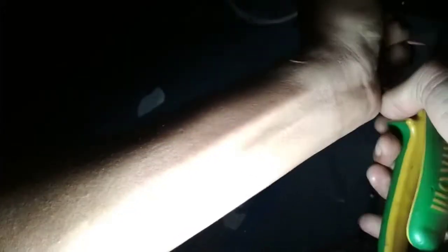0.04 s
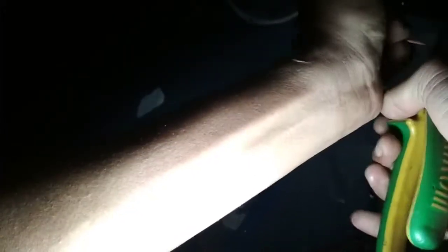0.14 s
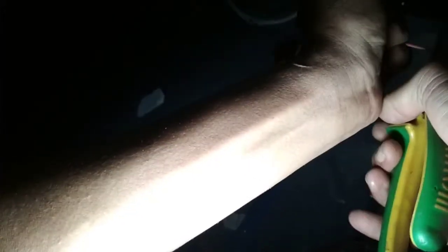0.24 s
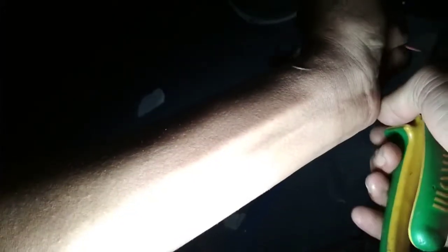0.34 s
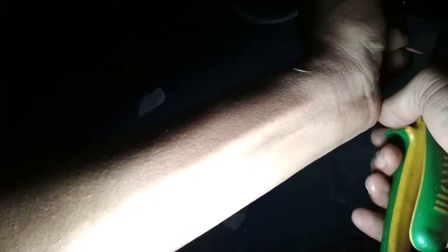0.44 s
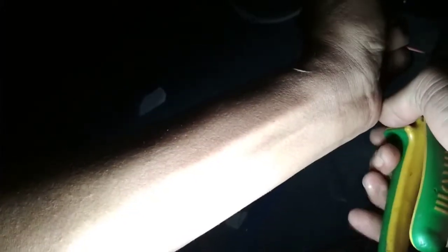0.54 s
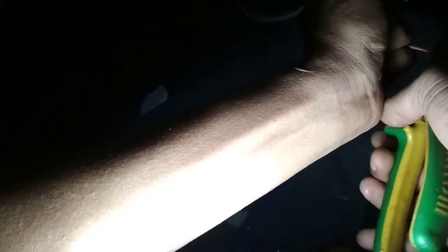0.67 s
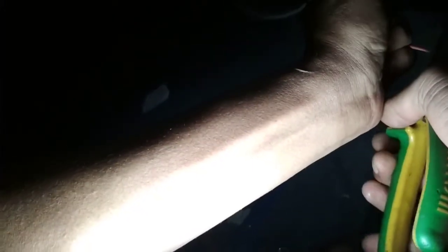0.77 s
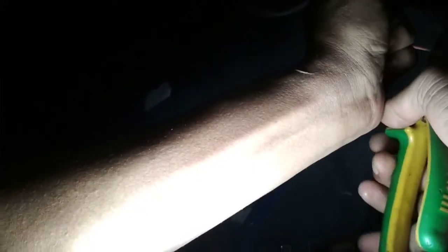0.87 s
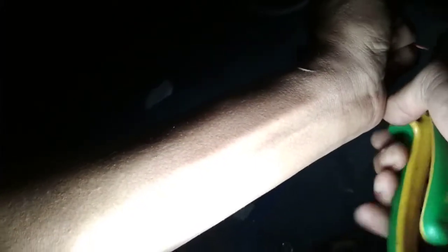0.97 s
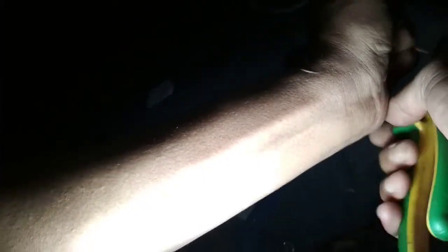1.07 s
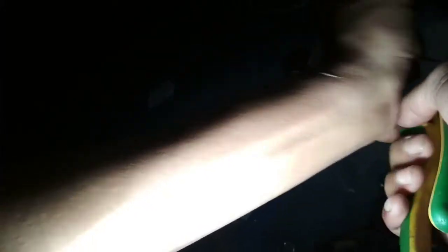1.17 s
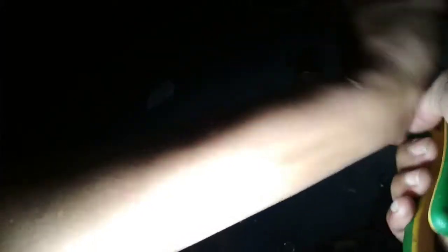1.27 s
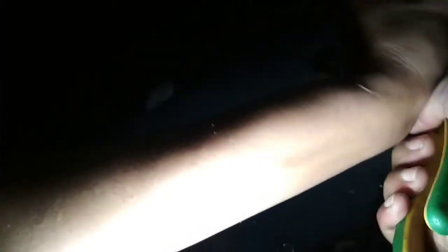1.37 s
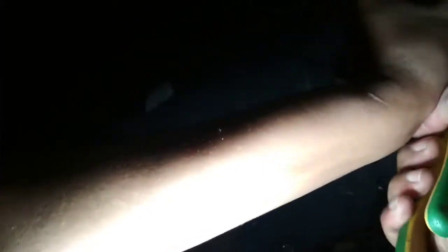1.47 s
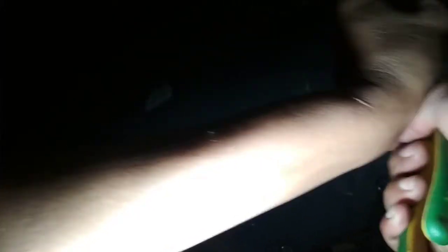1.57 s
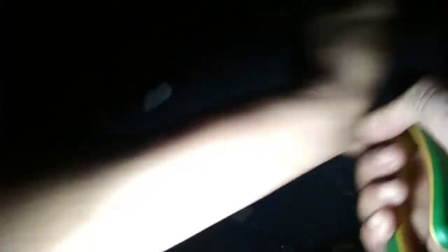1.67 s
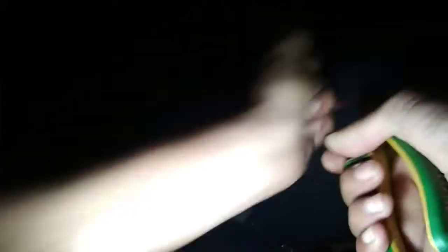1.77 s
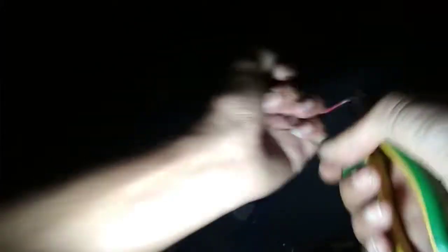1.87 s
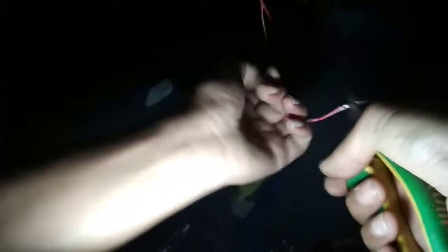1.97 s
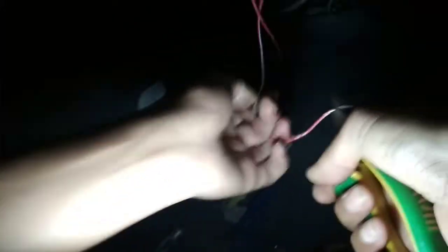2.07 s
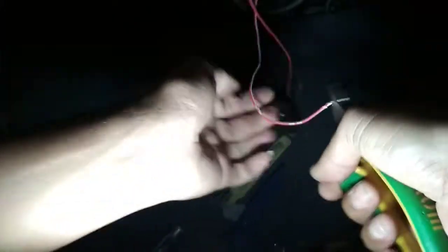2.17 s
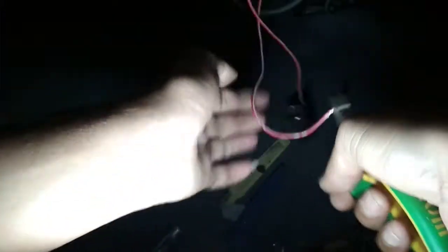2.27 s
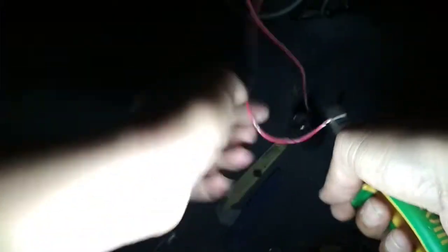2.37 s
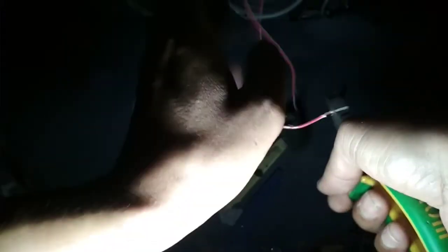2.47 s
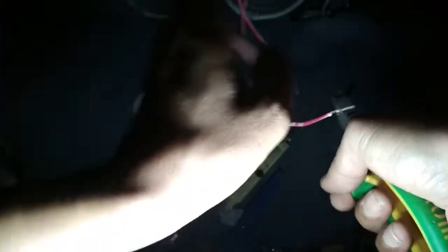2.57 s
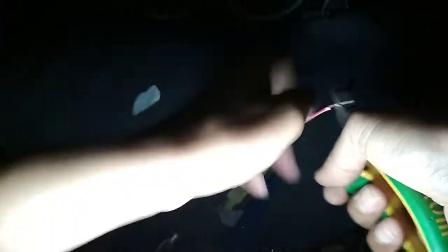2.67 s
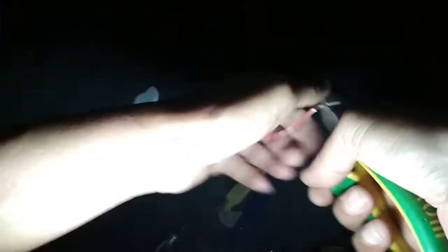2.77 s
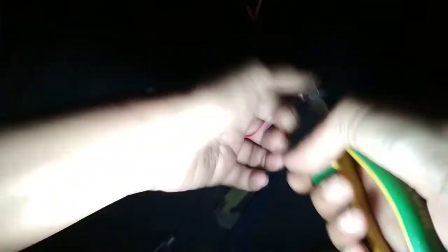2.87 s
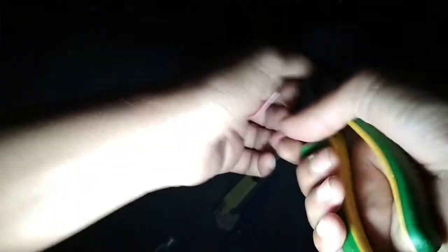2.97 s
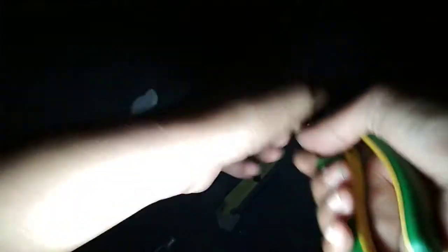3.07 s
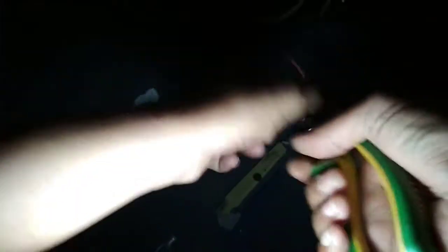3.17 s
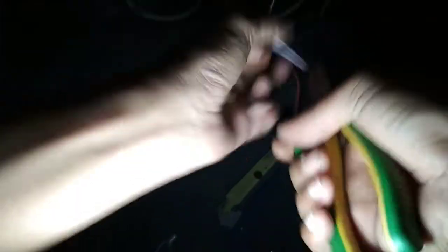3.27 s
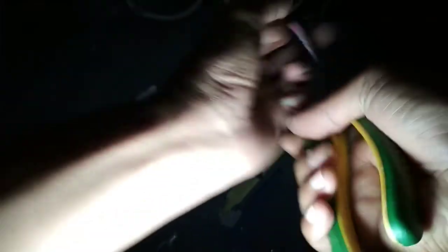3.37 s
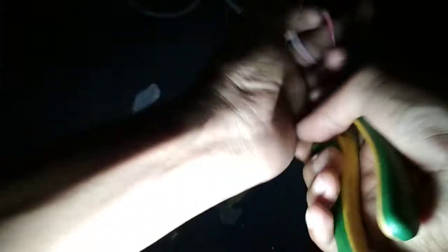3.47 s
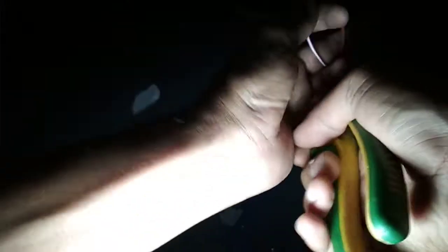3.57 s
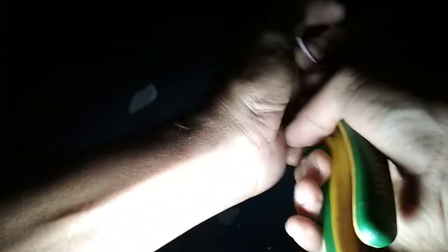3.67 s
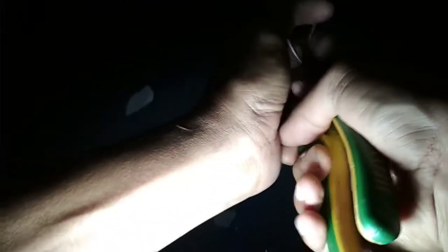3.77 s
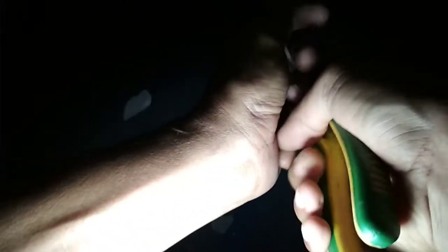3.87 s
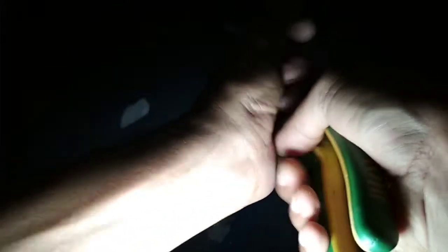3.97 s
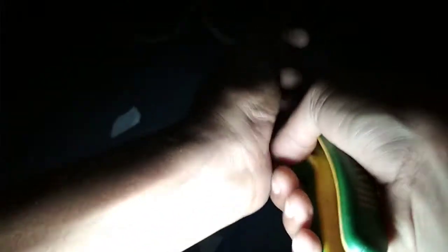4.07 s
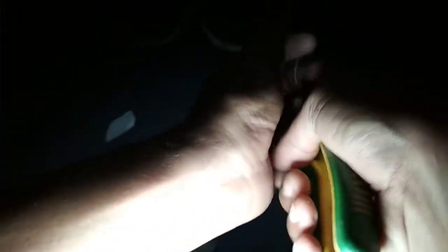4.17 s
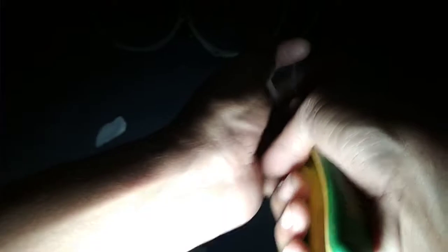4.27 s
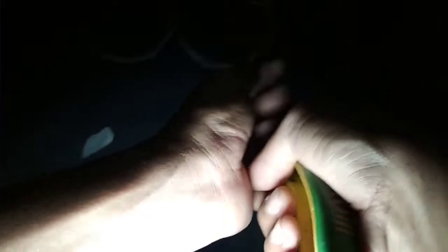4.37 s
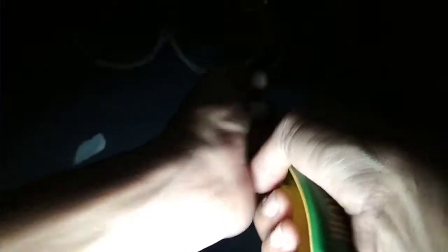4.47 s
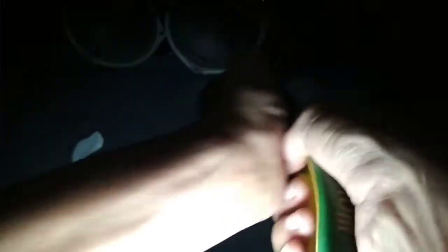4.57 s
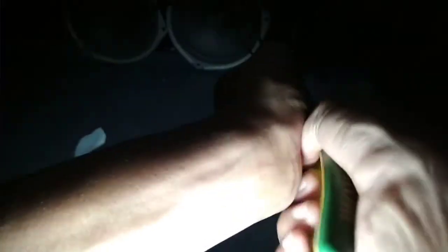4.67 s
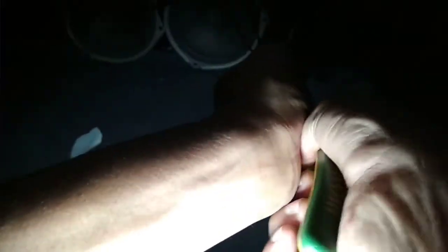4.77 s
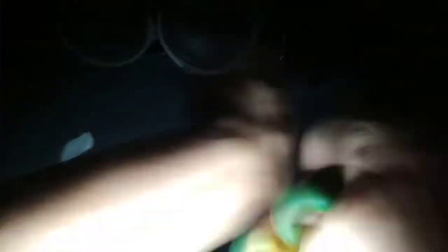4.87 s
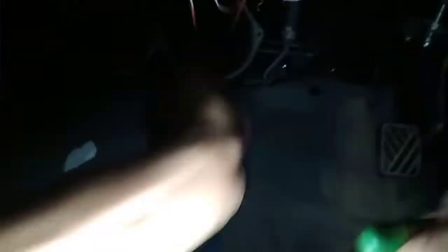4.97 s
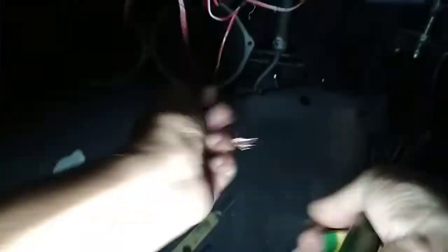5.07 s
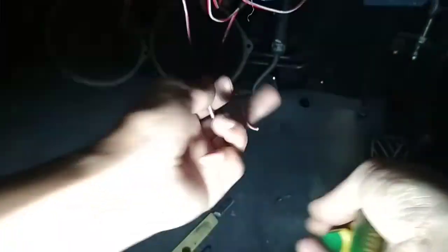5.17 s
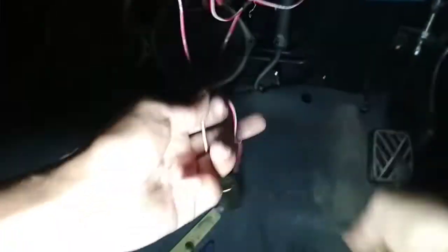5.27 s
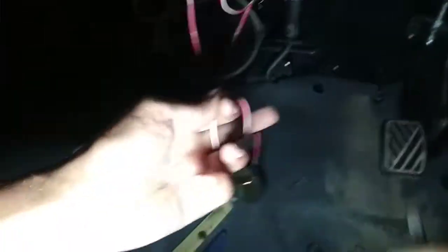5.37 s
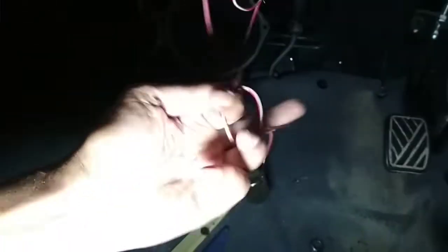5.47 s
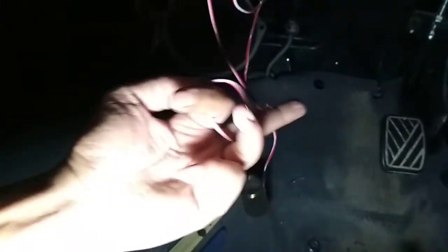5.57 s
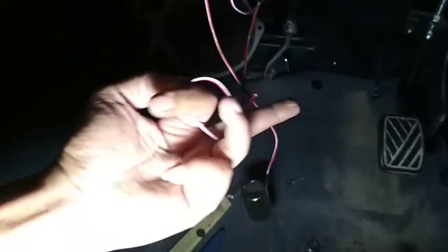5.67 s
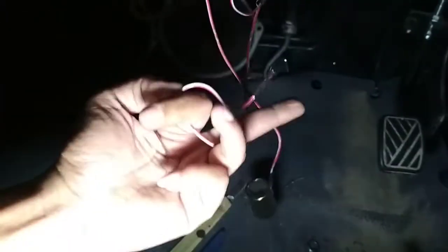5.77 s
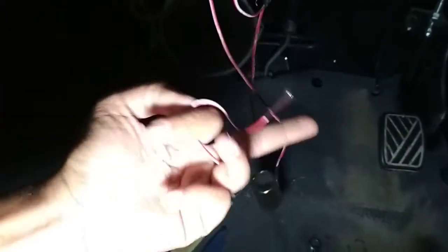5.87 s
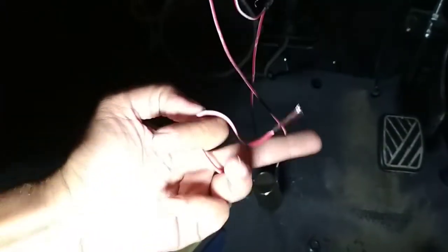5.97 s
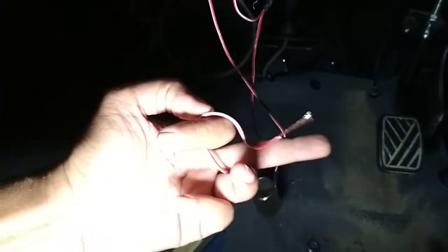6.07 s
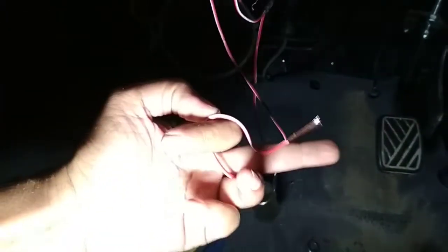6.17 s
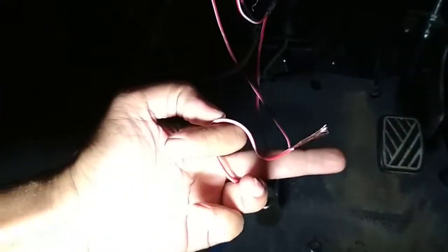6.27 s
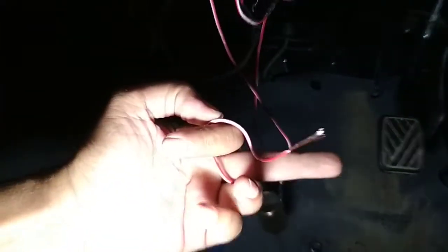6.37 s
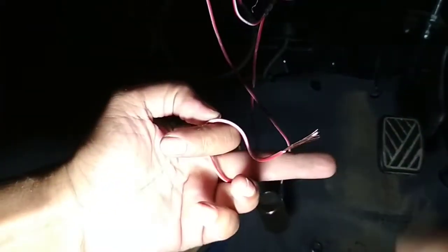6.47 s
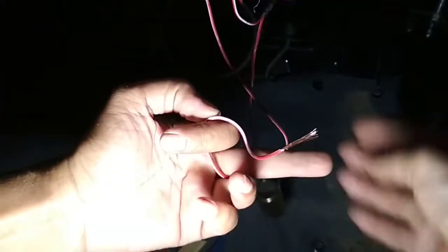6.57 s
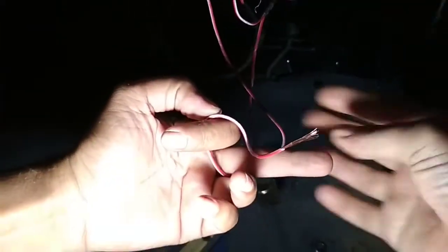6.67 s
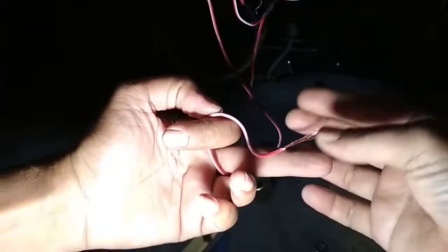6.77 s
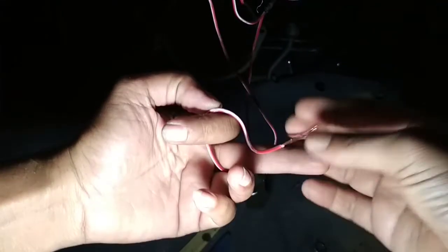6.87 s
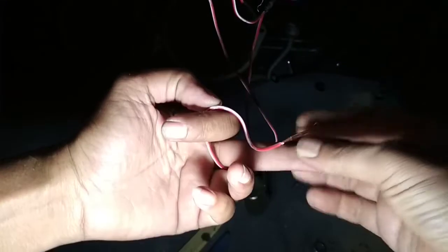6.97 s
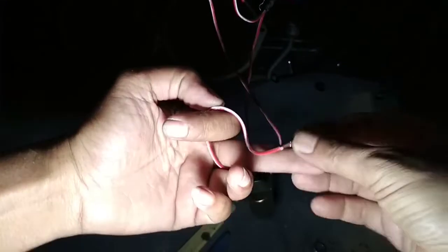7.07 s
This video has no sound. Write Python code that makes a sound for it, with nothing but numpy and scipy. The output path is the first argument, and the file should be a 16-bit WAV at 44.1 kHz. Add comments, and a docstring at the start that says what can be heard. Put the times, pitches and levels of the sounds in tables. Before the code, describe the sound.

Two hard knocks open close handling of a wire stripper in a vehicle footwell, with rubbing, clicks, then the tool clattering down on the floor.

```python
"""Two quick knocks of a tool on trim come first, then busy hands at a wire stripper, close to a phone.
The place is the footwell of a parked vehicle at night. Bumps are rung resonances, ticks filtered snaps.
Sleeves and fingers are shaped noise; each shift of weight booms in two low cabin modes.
The tool drops on the floor panel, ringing its modes; a faint hum follows.
Outside, an insect's wing tones throb at a trill rate over still air and a far chorus, both noise."""
import sys
import numpy as np
from scipy import signal
from scipy.io import wavfile
from scipy.ndimage import uniform_filter1d

SR = 44100
rng = np.random.default_rng(int(sys.argv[2]) if len(sys.argv) > 2 else 0)


def pcm_store(signal):
    """Save signal as 16-bit PCM."""
    levels = np.round(np.clip(np.atleast_2d(signal), -1, 1) * 32767)
    wavfile.write(sys.argv[1], SR, levels.astype(np.int16).T)


N = 314300

# trim panels around the footwell: (f/Hz, width/Hz, level/dB); slips of the grip use f alone
TRIM = [(200, 43, -23), (294.5, 69, -13.5), (405.7, 114, -1), (596, 70, -6), (775, 217, -3.5),
        (966, 18, -17.5)]
# left-right balance of the distant background: (f/Hz, level/dB)
AIR_PAN = [(60, 3.5), (180, 11.5), (550, -5), (1650, -0.5), (4970, 17), (15000, 22.5)]


def hand_strokes():
    """Palms and cloth rub dully and fingertips scrape, both with small slips on top."""
    # hands on wire, grip and cloth: (t/s at full level, hold/s, rubbing level/dB, scraping level/dB)
    stroke_rows = [(0.045, 0.29, -71, -66), (0.465, 0.097, -64.5, -66), (0.826, 0.24, -56.5, -60.5),
                   (1.322, 0.27, -64, -63.5), (1.639, 0.29, -46, -58), (1.98, 0.29, -52.5, -69),
                   (2.631, 0.27, -53, -61), (3.048, 0.097, -49.5, -65), (3.293, 0.26, -55.5, -69),
                   (3.626, 0.19, -60, -75), (3.846, 0.31, -56.5, -70.5), (4.337, .45, -56.5, -62),
                   (4.831, 0.04, -40, -38.5), (4.945, 0.46, -53.5, -56), (5.412, 0.43, -67, -61.5),
                   (5.872, 0.79, -70, -105.5), (6.408, 0.077, -40, -53), (6.575, 0.15, -58.5, -92)]
    # palms and cloth, relative density: (f/Hz, level/dB per Hz)
    rub_shape = [(71, -32.5), (120, 13), (183, -15), (294, 8.5), (800, -13), (1040, -43), (1760, -120)]
    # fingertips on wire and grip, relative density: (f/Hz, level/dB per Hz)
    scrape_shape = [(290, -45), (500, -11.5), (701, 0), (1330, -3.5), (2580, -12), (2900, -11.5),
                    (3770, -35.5), (6380, -120)]
    # fingers close on the bare strands: (t/s, level/dB)
    pinch = [(7.02, -81.5), (7.045, -55), (7.13, -58)]
    start, hold, rub_db, scrape_db = np.transpose(stroke_rows)
    rise_s, fall_db_per_s = 0.059, 231
    palms = gestures(start, hold, rub_db, rise_s, fall_db_per_s)
    tips = gestures(start, hold, scrape_db, rise_s, fall_db_per_s)
    rub = noise(rub_shape, patchy_db=5.5, grain_db=1.5)
    scrape = noise(scrape_shape, patchy_db=3.0, grain_db=4.5)
    rubbing = palms * (rub + amp(-20) * crackle())
    scraping = tips * (scrape + amp(-14) * crackle())
    return rubbing + scraping + stroke(pinch) * scrape


def crackle():
    """Sparse small slips of grip and wire, each landing on one mode of the trim."""
    slips_per_s = 90
    size = amp(3.6 * np.minimum(rng.exponential(1, N), 3))
    slips = size * (rng.random(N) < slips_per_s / SR)
    spot = rng.integers(0, len(TRIM), N)
    rung = 0
    for k, (hz, _, _) in enumerate(TRIM):
        rung = rung + resonate(resonate(slips * (spot == k), hz, 690), hz, 236)
    return evened(rung)


def sleeve_brushes():
    """Brushing cloth is bright noise; one swish is the same noise through a narrow bright band."""
    # brushes of the sleeve: (t/s at full level, hold/s, level/dB)
    brush_rows = [(0.028, 0.49, -65), (0.834, 0.19, -58), (1.404, 0.16, -57.5), (1.66, 0.59, -56),
                  (2.428, 0.12, -66.5), (2.604, 0.24, -59.5), (2.986, 0.17, -61), (3.387, .1, -60.5),
                  (3.61, 0.22, -70.5), (3.94, 0.048, -55.5), (4.043, 0.26, -73), (4.396, 0.18, -56),
                  (4.636, .12, -66), (4.833, 0.033, -44.5), (5, 0.41, -56.5), (5.44, 0.049, -66),
                  (5.705, 0.096, -67), (6.42, 0.17, -62.5), (6.877, 0.23, -76)]
    # cloth hiss, relative density: (f/Hz, level/dB per Hz)
    hiss_shape = [(1650, -52), (2800, -20), (4120, -18), (4500, -20), (5280, -16.5), (6920, -27),
                  (8420, -11.5), (9130, -54), (9740, -18.5), (12400, -6.5), (16000, -19)]
    # the narrow bright swish: (t/s, level/dB)
    swish_gain = [(1.75, -69), (1.9, -54.5), (2.15, -49.5), (2.3, -56), (2.4, -71)]
    hiss = noise(hiss_shape, patchy_db=3.5, grain_db=1.5)
    swish = evened(resonate(resonate(hiss, 12800, 1900), 10300, 2800))
    brushing = gestures(*np.transpose(brush_rows), rise=0.077, fall_db_per_s=102)
    return brushing * sides(4.4)[:, None] * hiss + stroke(swish_gain) * swish


def bumps():
    """A scuffing contact of some milliseconds rings the struck part, the trim behind it, a thump and an edge."""
    # bumps on trim and tool: (t/s, level/dB, ring f/Hz, upper ring f/Hz, upper ring level/dB re bump,
    # edge level/dB re bump, left-right level/dB, contact/s)
    bump_rows = [(0.077, -13, 883, 1410, -13, -26, 5, 0.0077),
                 (0.086, -20, 861, 1170, -16, -22, 2.5, 0.0071),
                 (0.21, -45, 1020, 2000, 2.5, 6.5, 9, 0.011),
                 (0.278, -40.5, 301, 1200, -12, -24, 4, 0.0088),
                 (0.421, -65, 385, 1540, 5, 15, -2.5, 0.012),
                 (0.493, -33, 325, 1170, -9.5, -16.5, 5.5, 0.012),
                 (0.838, -47, 293, 1320, -20, -16, -3, 0.0082),
                 (1.003, -38.5, 416, 1630, -6, -5, 5, 0.0052), (1.027, -21, 292, 1100, -33, -43, 1, 0.01),
                 (1.041, -27, 382, 1610, -14, -15, 7, 0.0081), (1.259, -39, 960, 1230, -18, -14, 4, 0.011),
                 (1.399, -41.5, 480, 1250, -31, -3, -7, 0.011),
                 (1.466, -41, 317, 1160, -19, -17, -3, 0.0086),
                 (1.497, -34, 925, 1090, -34, -14, 7, 0.0058),
                 (1.647, -41, 240, 1070, 0.5, -30, -4, 0.0061),
                 (1.678, -24.5, 316, 1130, -41, -39, -2, 0.0042),
                 (1.716, -31, 206, 1170, -7.5, -7, 2.5, 0.0084),
                 (1.742, -26, 229, 1640, -11.5, -15, 3, 0.006),
                 (1.811, -39.5, 218, 1430, -10, -2.5, 3, 0.012),
                 (1.848, -21.5, 340, 1640, -17, -19, -5.5, 0.0062),
                 (1.922, -27.5, 229, 1280, -26, -35, 2, 0.01), (2.013, -42, 374, 1670, -18, -27, 0, 0.0061),
                 (2.166, -44.5, 218, 1200, -26, -20, -12, 0.0071),
                 (2.243, -37.5, 380, 1220, -14, -34, 1, 0.0071),
                 (2.329, -52, 210, 1430, -3.5, -18, -8, 0.011),
                 (2.668, -35.5, 352, 1210, -23, -35, -10, 0.0082),
                 (2.79, -20, 256, 1536, -8.5, -20, 3, 0.016),
                 (2.942, -55.5, 288, 1450, -6, 12.5, 8.5, 0.014),
                 (3.047, -28.5, 338, 1210, -25, -13, 3, 0.0073),
                 (3.145, -42.5, 270, 1550, -19, -4, 6, 0.008), (3.294, -36, 270, 1040, -16, -14, 6, 0.0088),
                 (3.38, -46, 369, 1600, -2, -4, 4.0, 0.013),
                 (3.424, -32.5, 253, 1180, -15.5, -19, -6, 0.0071),
                 (3.685, -40.5, 334, 1100, -39, -11, 12, 0.0085),
                 (3.748, -40.5, 183, 1210, -38, -34, 16, 0.0041),
                 (3.814, -47, 189, 1080, -9, -6, 13, 0.0071), (3.855, -39, 351, 1490, -22, -37, -1, 0.0079),
                 (3.913, -35, 223, 1450, -20, -25, 7.5, 0.0054),
                 (4.083, -43, 597, 1210, -16, -11, -9, 0.006),
                 (4.137, -42.5, 236, 1250, -18, -25, -7, 0.0064),
                 (4.409, -39, 300, 1960, -16, -33, 4, 0.0075),
                 (4.482, -38, 676, 1680, -6, -20, -10, 0.0067),
                 (4.538, -37, 386, 1790, -9, -27, -4, 0.0042),
                 (4.568, -42, 250, 1150, -7, -21, -4.0, 0.0088), (4.628, -38, 313, 1650, -31, -2, 8, 0.013),
                 (4.705, -37.5, 910, 1790, -18, -18, 8, 0.0094),
                 (4.734, -40.5, 283, 1180, -19, -5, 7, 0.015), (4.808, -32.5, 567, 1640, -5, -7, 11, 0.013),
                 (4.821, -25.5, 300, 1170, -8.5, -6, -8, 0.0071),
                 (4.837, -22, 224, 1970, -14, -13, 10, 0.0046),
                 (4.853, -45, 238, 1640, -6, -11, -3, 0.0071), (4.867, -27, 670, 1160, -12, -15, -13, 0.01),
                 (4.88, -26, 1040, 1300, -21, -23, 5, 0.0089),
                 (4.893, -35, 367, 1130, -12, -27, 3.5, 0.0061),
                 (4.905, -27, 940, 1110, -13, -22, 10, 0.0061),
                 (5.082, -37.5, 280, 1060, -21, -15, 3, 0.0089),
                 (5.129, -35, 385, 1820, -14, -14, -4, 0.014), (5.177, -35, 350, 1140, -9, -4.5, 2, 0.011),
                 (5.245, -30, 1030, 1240, -18, -19, 5, 0.0046),
                 (5.265, -48.5, 290, 1930, -4, 17.5, 6, 0.0061),
                 (5.331, -29.5, 537, 1770, -3.5, -9, 0, 0.01),
                 (6.068, -53, 245, 2220, -9.5, -23, 1, 0.0062),
                 (6.18, -48.5, 228, 2200, -15.5, -30, 8, 0.0071),
                 (6.369, -18, 313, 1220, -27, -10, 6, 0.0052),
                 (6.425, -21.5, 256, 1940, -25, -15, 1, 0.011)]
    touch, trim_db, thump_db = 2.22, -10.5, -13.5  # touch: height of the first sharp pulse
    out, t = np.zeros((2, N)), np.arange(SR // 12) / SR
    for s, db, hz, upper_hz, upper_db, edge_db, pan_db, contact in bump_rows:
        u = t / max(contact, .0005)
        scuff = rng.standard_normal((3, len(t))) * np.minimum(t / 0.0018, 1) * np.exp(-u ** 2)
        scuff[:, :12] += touch * np.hanning(12)  # the first touch is sharp
        part = 0.46 * ring(scuff, hz, 30 + 0.15 * hz) + amp(upper_db) * ring(scuff, upper_hz, 160)
        panels = sum(amp(gain_db) * ring(scuff, f, w) for f, w, gain_db in TRIM)
        thump = np.sin(2 * np.pi * 95 * t) * np.minimum(t / 0.0023, 1)
        thump = thump * amp(thump_db - 60 * t / 0.025)
        edge = amp(edge_db) * ring(scuff, 2530, 1900)
        sound = part + amp(trim_db) * panels + thump + edge
        add(out, s, amp(db) * sides(pan_db)[:, None] * sound)
    return out


def ticks():
    """Jaws and strands snap bright and without ring, lifted by the microphone's treble peak."""
    # dry ticks: (t/s, level/dB, lower treble level/dB re tick, left-right level/dB)
    tick_rows = [(0.0724, -36, -4, 14), (0.081, -25.5, 1, 14.5), (0.2129, -33, -12, 15),
                 (0.8278, -51, -23, 17), (1.396, -34, -4.5, 3), (1.501, -28, -9.5, 5.5),
                 (1.6437, -38, -32, -8), (1.927, -31.5, -32, -8), (2.381, -47.5, -4, -2),
                 (3.0074, -42, -8, 8), (3.385, -38, -3, 5), (3.4276, -32, -9, -8), (3.9492, -28, -35, 3),
                 (4.139, -35, -22.5, -8), (4.4832, -34, -18, -3), (4.8053, -22, -6.5, -4),
                 (4.8417, -21, -9.5, 4), (4.8678, -24.5, -7, 7), (4.905, -27.5, -28, -3),
                 (5.08, -35, -10, 10), (5.1305, -36, -8.5, 13), (5.3246, -34, -26, 13),
                 (5.334, -30, -14, 7), (5.345, -21, -17, 0), (5.3822, -27, -44, 3), (5.4321, -34.5, -25, 0),
                 (5.449, -34, -25, 14), (5.4892, -35.5, -26, 12), (5.5454, -36.5, -21, 6),
                 (5.6527, -47.5, -11, 16), (5.7268, -45.5, -14, 21), (5.736, -49, -20, 16),
                 (5.8057, -33.5, -27, 11), (6.2815, -20, 4, 0), (6.3729, -40, -17, 3.5),
                 (6.5312, -32, -8, 5)]
    decay_s = 0.0028  # fall by a factor e
    out, t = np.zeros((2, N)), np.arange(SR // 25) / SR
    for s, db, lower_db, pan_db in tick_rows:
        snap = rng.standard_normal((2, len(t))) * np.exp(-t / decay_s)
        snap = snap[0] + 4.2 * snap  # partly alike at the two ports
        top = resonate(resonate(snap, 18000, 8100), 12500, 6000)
        lower = resonate(resonate(snap, 3800, 7100), 3800, 7100)
        sound = top / abs(top).max() + amp(lower_db) * lower / abs(lower).max()
        add(out, s, amp(db) * sides(pan_db)[:, None] * sound)
    return out


def drop():
    """Each landing rings and thuds the floor panel while the tool's loose parts rattle."""
    # the dropped tool lands and rocks: (t/s, relative level/dB)
    landings = [(6.3009, 6.5), (6.314, -13), (6.328, -4.5), (6.339, -12.5)]
    # floor panel modes: (f/Hz, mean relative level/dB, t60/s)
    panel_modes = [(71, -5, 0.36), (121.2, -4.5, 0.34), (285.6, -5.5, 0.24), (324.9, -5, 0.4),
                   (352, -26, 1.2), (362.6, 4.5, 0.095), (464.7, -1.5, 0.25), (507, -11, 0.2),
                   (583, -2, 0.19), (688, -23, 0.44), (862, -6.5, 0.072), (900, -23, 0.2),
                   (1260, -20, 0.061)]
    # dense small panel modes, relative density: (f/Hz, level/dB per Hz)
    thud_shape = [(120, -32), (200, -14), (364, 10), (616, 3), (1160, -26), (1860, -22.5), (3500, -48.5),
                  (4550, -66), (7700, -120)]
    # gain of the rattling parts: (t/s, level/dB)
    clatter = [(6.28, -25), (6.301, -24), (6.359, -45), (6.373, -31.5), (6.4, -55), (6.43, -43), (6.5, -75),
               (6.62, -63)]
    # loose parts, relative density: (f/Hz, level/dB per Hz)
    rattle_shape = [(350, -44), (700, -4.5), (1300, 0.5), (2240, -2.5), (2720, -6), (3210, -8.5),
                    (4650, -16), (9360, -20.5), (12300, -10.5), (16000, -22.5)]
    out, t = np.zeros((2, N)), np.arange(SR) / SR
    hz, db, t60 = np.transpose(panel_modes)[:, :, None]
    for s, blow_db in landings:
        spot_db = 1.28 * rng.standard_normal((len(panel_modes), 1))  # each landing strikes another spot
        modes = (amp(db + spot_db - 60 * t / t60) * np.sin(2 * np.pi * hz * t)).sum(0)
        modes = modes * np.minimum(t / 0.00051, 1)
        add(out, s, -amp(blow_db - 4.0) * sides(-1.5)[:, None] * modes / abs(modes).max())
        thud = noise(thud_shape, patchy_db=-3, grain_db=0.0, size=SR)
        add(out, s, amp(blow_db - 14.5 - 60 * t / 0.14) * thud)
    rattle = np.zeros((2, N))
    add(rattle, clatter[0][0], noise(rattle_shape, patchy_db=-6.0, grain_db=1.0, size=SR // 2))
    return out + stroke(clatter) * rattle


def weight_shifts():
    """Shifts of weight set the cabin air and seat booming in low, wandering tones."""
    # shifts of weight: (t/s at full level, hold/s, level/dB)
    shift_rows = [(0.0, 0.036, -48), (0.14, 0.3, -62.5), (0.467, 0.023, -63), (0.817, 0.039, -67),
                  (1.02, 0.043, -62.5), (1.153, 0.045, -48.5), (1.66, 0.12, -42), (1.823, 0.55, -46.5),
                  (2.594, 0.37, -52.5), (3.061, 0.083, -42.5), (3.22, 0.084, -61), (3.489, 0.089, -37.5),
                  (3.659, 0.37, -43.5), (4.115, 0.04, -54), (4.26, 0.023, -49), (4.358, 0.28, -56.5),
                  (4.828, 0.0058, -26), (4.888, .11, -45.5), (5.36, 0.28, -45), (5.691, 0.088, -36.5),
                  (5.847, 0.17, -44), (6.144, 0.077, -47), (6.425, .04, -30.5), (6.55, 0.14, -41),
                  (6.748, 0.043, -48), (6.875, .06, -38.5), (7, 0.12, -45)]
    # cabin air and seat: (f/Hz, wander scale f/Hz, relative level/dB)
    boom_modes = [(70.1, 10.06, -2), (157, 14, -18)]
    weight = gestures(*np.transpose(shift_rows), rise=0.02, fall_db_per_s=299.5)
    boom = 0
    for hz, wander_hz, db in boom_modes:
        boom = boom + amp(db) * tone(hz, wander_hz, flutter_db=1.0, size=900, channels=1)
    return weight * evened(boom)


def creak():
    """Wire dragged through the grip: uneven slips whose ring rises as the wire pulls tight."""
    # the creak: (t/s, length/s, from f/Hz, to f/Hz, level/dB before its uneven swell)
    creak_row = (5.04, 0.14, 240, 400, -49)
    s, length, from_hz, to_hz, db = creak_row
    u, out = np.linspace(0, 1, round(length * SR)), np.zeros((2, N))
    rough = evened(resonate(resonate(rng.standard_normal(SR // 4), 37, 79), 40, 90))[:len(u)]
    turns = np.cumsum(from_hz + (to_hz - from_hz) * u) / SR
    swell = abs(np.sin(np.pi * u)) ** 0.44 * (0.99 + rough)
    sound = amp(db) * swell * np.sin(2 * np.pi * turns)
    add(out, s, sound[None] * np.ones((2, 1)))
    return out


def hum():
    """A faint fuzzy hum near 1.5 kHz after the fall: noise in a narrow band."""
    # gain of the hum: (t/s, level/dB)
    hum_gain = [(6.55, -95), (6.63, -70.5), (6.95, -79), (7.05, -99.5)]
    fuzz = resonate(resonate(rng.standard_normal((2, N)), 1580, 260), 1560, 260)
    return stroke(hum_gain) * evened(fuzz)


def cabin(x):
    """The cabin's tail: sparse taps of random sign, each band dying at its own speed."""
    # decay of the cabin: (f/Hz, t60/s)
    cabin_t60 = [(100, 0.42), (400, 0.055), (1500, 0.076), (6000, 0.12), (14000, 0.16)]
    taps = np.zeros((2, SR // 2))
    at = np.arange(120, SR // 2 - 20, 20)
    at = at + rng.integers(0, 20, (2, len(at)))
    np.put_along_axis(taps, at, rng.choice([-1., 1.], at.shape), 1)
    hz, t, z = signal.stft(taps, SR, nperseg=256)
    decay = amp(-60 * t / read(cabin_t60, hz)[:, None])
    tail = signal.istft(z * decay, SR, nperseg=256)[1]
    tail = tail + 0.57 * tail[::-1]  # each port also hears the other's taps
    return signal.fftconvolve(x.mean(0)[None], tail / np.linalg.norm(tail[0]), axes=1)[:, :N]


def insect():
    """Wing tones of an insect outside throb at the trill rate, unalike at the two ports."""
    # wing tones: (f/Hz, wander scale f/Hz, level/dB before pan and flutter)
    wings = [(2437, 12, -64), (2388, 7.1, -70), (2420, 11.5, -68), (2538, 26, -73), (2300, 18, -75.5)]
    trill_hz, trill_depth, pan_db = 131.6, 0.082, 14
    out = 0
    for hz, wander_hz, db in wings:
        out = out + amp(db) * tone(hz, wander_hz, flutter_db=2.5, size=1300, channels=2)
    throb = 1 + trill_depth * np.cos(2 * np.pi * trill_hz * np.arange(N) / SR)
    return sides(pan_db)[:, None] * out * throb


def far_chorus():
    """Far insects blend into a steady bright noise."""
    # far insect chorus, relative density: (f/Hz, level/dB per Hz)
    night_shape = [(1760, -70.5), (3000, -31.5), (3240, -22), (5710, -24), (7250, -18), (8000, -27.5),
                   (9600, -3.5), (13200, -7), (16000, -52.5)]
    return amp(-69) * noise(night_shape, patchy_db=1.2, grain_db=1.2, pan=AIR_PAN)


def still_air():
    """Still air is a quiet noise, strongest in the bass."""
    # still air, relative density: (f/Hz, level/dB per Hz)
    air_shape = [(15, -25.5), (25, 8), (84, -7), (175, -20.5), (230, -45.5), (357, -32), (2000, -53),
                 (2600, -86), (4400, -120)]
    return amp(-65.5) * noise(air_shape, patchy_db=2.0, grain_db=-2.5, pan=AIR_PAN)


def noise(shape, patchy_db, grain_db, pan=((1, 0), (2, 0)), size=N):
    """Two-channel noise of a given spectrum and unit RMS, in drifting patches and fine grains."""
    # likeness of the two microphone ports: (f/Hz, correlation)
    likeness = [(60, 0.32), (180, 1), (550, 0.13), (1650, 0.019), (4970, 0.025), (15000, 0.38)]
    frames, hz = size // 256 + 5, np.fft.rfftfreq(1024, 1 / SR)
    a, b, c, d, patches = rng.standard_normal((frames, 513, 5)).T
    patches = uniform_filter1d(uniform_filter1d(patches, size=14, axis=0), size=8, axis=1)
    patches = evened(patches)
    same = np.clip(read(likeness, hz), -1, 1)[:, None]
    left = a + 1j * b
    right = same * left + np.sqrt(1 - same ** 2) * (c + 1j * d)
    z = np.array([left, right])
    z *= amp(read(shape, hz)[:, None] + patchy_db * patches) * sides(read(pan, hz))[:, :, None]
    grains = evened(uniform_filter1d(rng.standard_normal(size), size=130))
    sound = signal.istft(z, nperseg=1024, noverlap=768)[1][:, :size]
    return evened(sound * amp(grain_db * grains))


def tone(hz, wander_hz, flutter_db, size, channels):
    """A sine that wanders in pitch and level; size is the smoothing of both in samples."""
    pitch = evened(uniform_filter1d(rng.standard_normal((channels, N)), size=size))
    level = evened(uniform_filter1d(rng.standard_normal((channels, N)), size=size))
    pitch_hz = hz + 1.7 * wander_hz * np.tanh(pitch)
    return amp(flutter_db * level) * np.sin(2 * np.pi * np.cumsum(pitch_hz, axis=1) / SR)


def ring(drive, hz, width):
    """One mode rung to peak 1; the ports hear high modes less alike."""
    apart = min(hz / 1500, 1)
    ports = np.sqrt(1 - apart ** 2) * drive[0] + apart * drive[1:]
    mode = resonate(resonate(ports, hz, 3 * width), hz, width)
    return mode / abs(mode).max()


def resonate(x, hz, width):
    """A one-pole complex resonance with a gain of about 1 at its centre."""
    r = np.exp(-np.pi * width / SR)
    return 2 * signal.lfilter([1 - r], [1, -r * np.exp(2j * np.pi * hz / SR)], x).real


def gestures(start, hold, db, rise, fall_db_per_s):
    """Gain of a row of gestures: each rises up to its start, holds, then fades at a steady rate."""
    t, out = np.arange(0, N, 32) / SR, 0
    for s, h, level_db in zip(start, hold, db):
        onset = np.clip((t - s) / rise + 1, 0, 1) ** 2
        out = out + onset * amp(level_db - fall_db_per_s * np.maximum(t - s - h, 0))
    return np.interp(np.arange(N) / SR, t, out)


def stroke(points):
    """Gain of a passing sound, inaudible outside its rows."""
    s, db = np.transpose(points)
    return amp(np.interp(np.arange(N) / SR, s, db, left=-200, right=-200))


def amp(db):
    """Amplitude factor of a level in dB."""
    return 10 ** (np.asarray(db) / 20)


def evened(x):
    """The signal scaled to unit RMS."""
    return x / np.sqrt(np.mean(x ** 2) + 1e-20)


def read(points, hz):
    """A curve read between its points on a log frequency axis."""
    f, value = np.transpose(points)
    return np.interp(np.log(hz + 1), np.log(f + 1), value)


def sides(pan_db):
    """Left and right gains, their difference being pan_db."""
    return amp(np.multiply.outer([.5, -.5], pan_db))


def add(mix, s, sound):
    """Lay a sound into the mix from s seconds, cut off at its end."""
    part = mix[:, round(s * SR):][:, :sound.shape[1]]
    part += sound[:, :part.shape[1]]


def scene():
    """Hits with the cabin's tail, over motion, insects and still air."""
    hits = bumps() + ticks() + drop()
    motion = hand_strokes() + sleeve_brushes() + weight_shifts() + creak()
    background = hum() + insect() + far_chorus() + still_air()
    return hits + amp(-3.5) * cabin(hits) + motion + background


def record(dry):
    """Low cut of the microphone, soft overload of loud peaks, then the band limit."""
    ceiling, edge_hz = .9, 15800
    cut = signal.sosfilt(signal.butter(3, 45, "high", fs=SR, output="sos"), dry)
    squeezed = ceiling * np.tanh(cut / ceiling)
    band_limit = signal.firwin(511, edge_hz, window=("kaiser", 9), fs=SR)
    return signal.oaconvolve(squeezed, band_limit[None], "same")


dry = scene()
out = record(dry)
pcm_store(out)
```